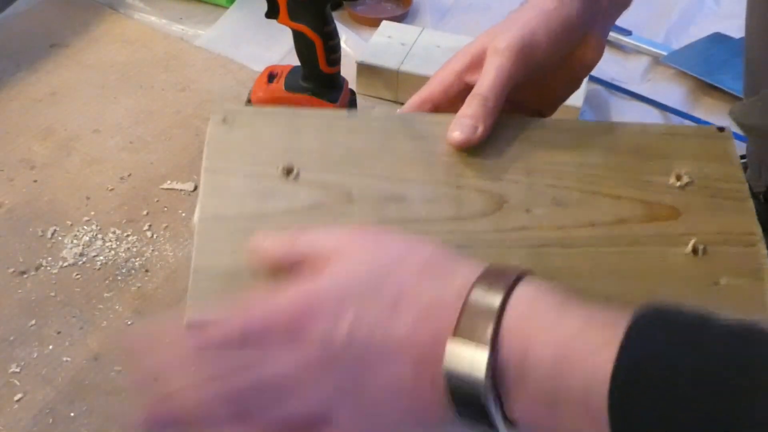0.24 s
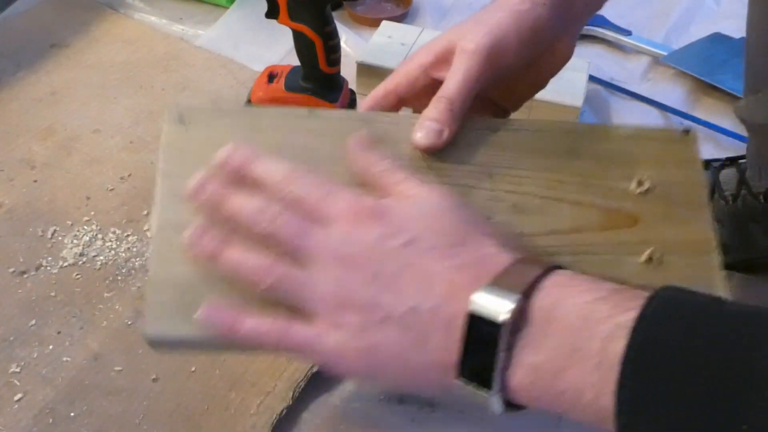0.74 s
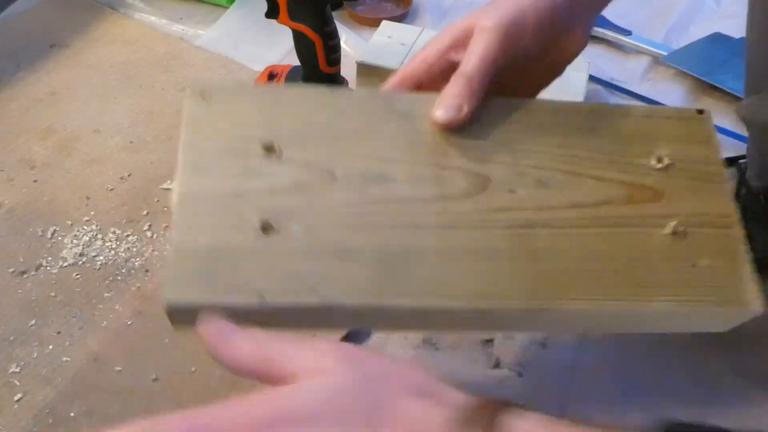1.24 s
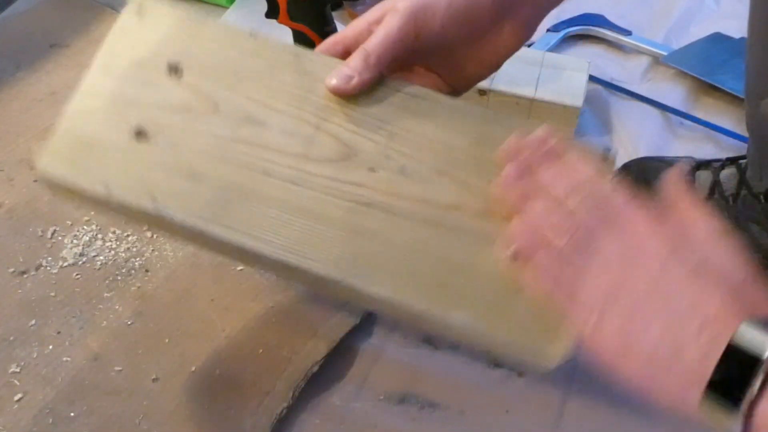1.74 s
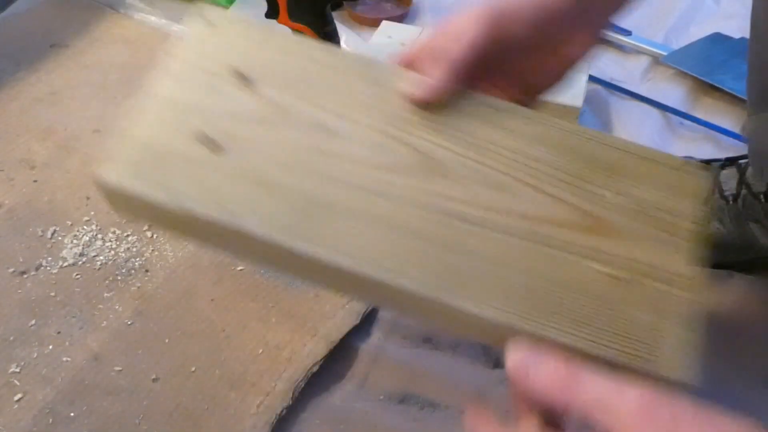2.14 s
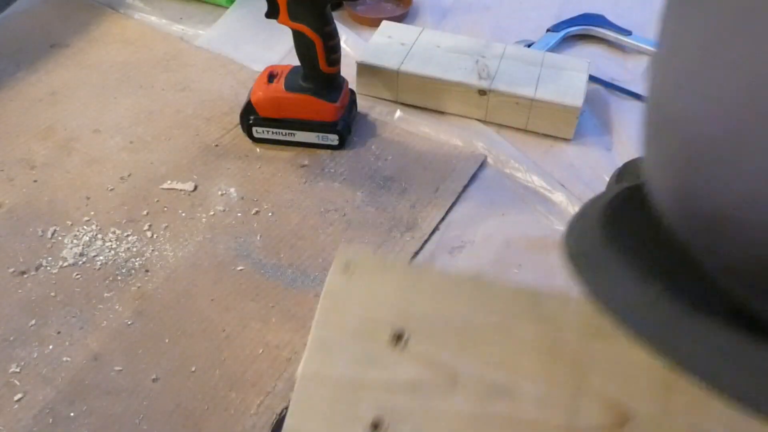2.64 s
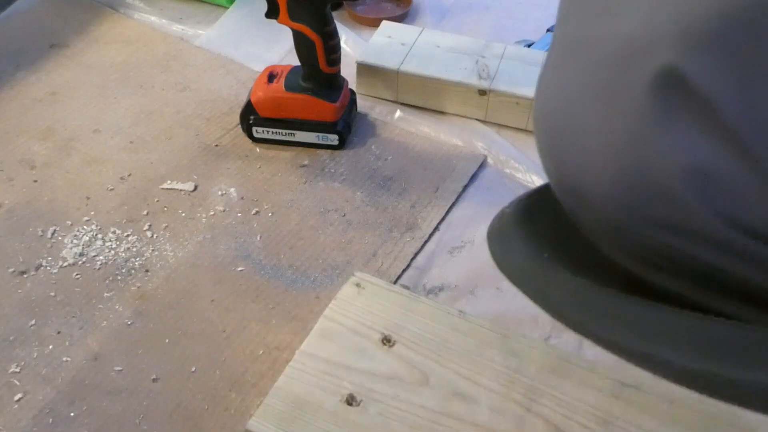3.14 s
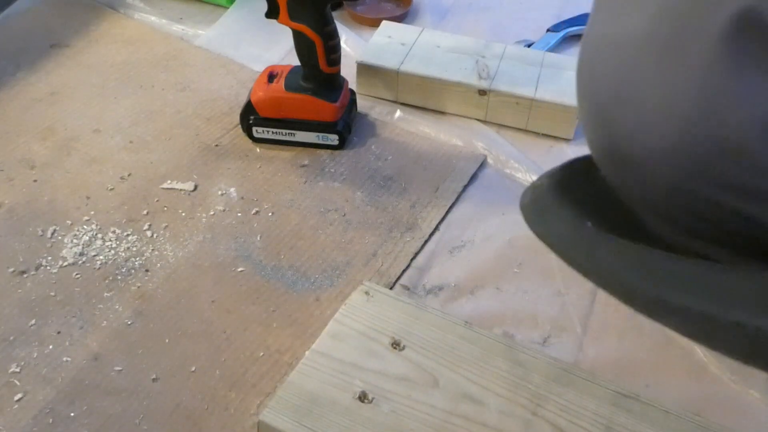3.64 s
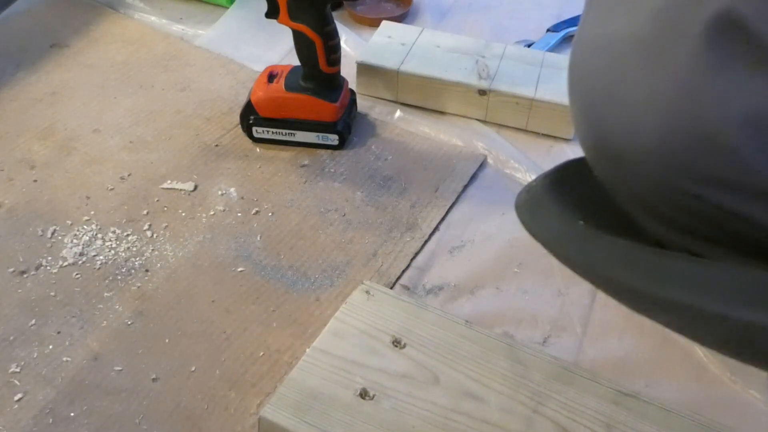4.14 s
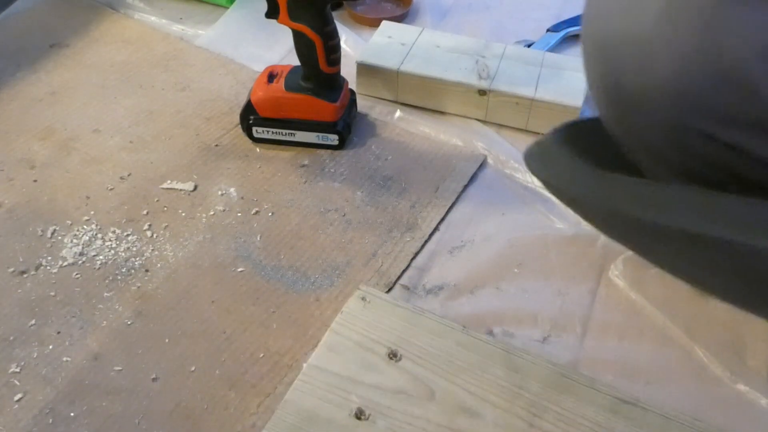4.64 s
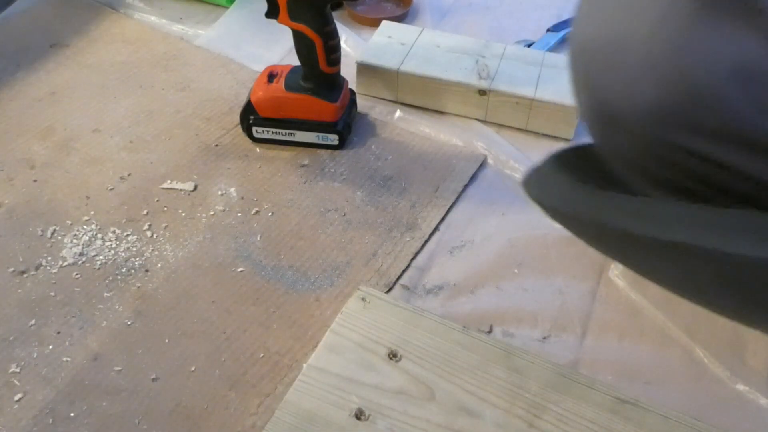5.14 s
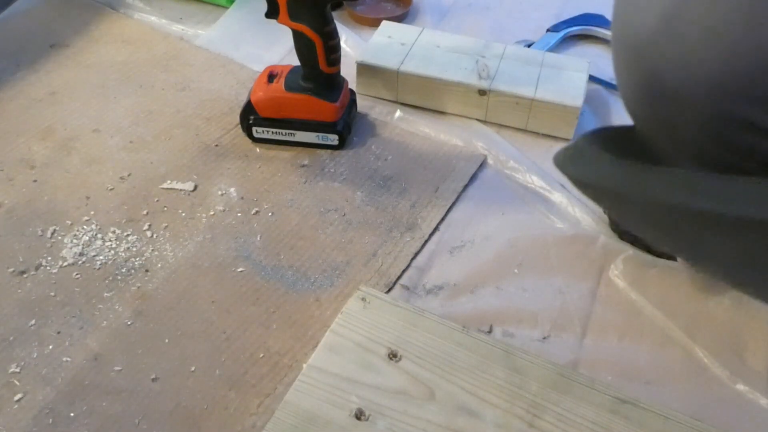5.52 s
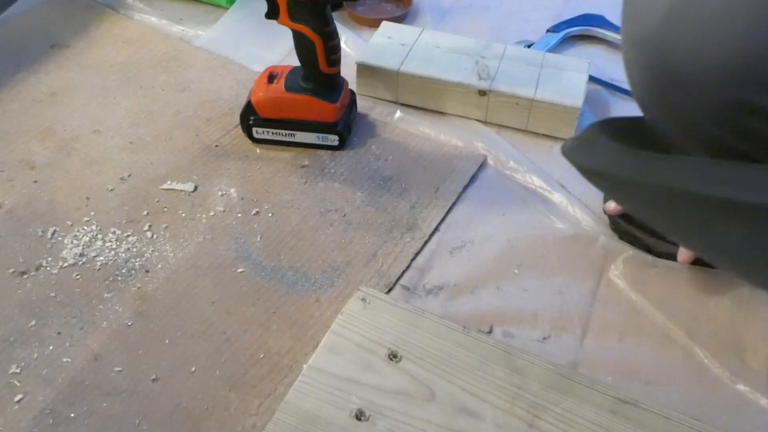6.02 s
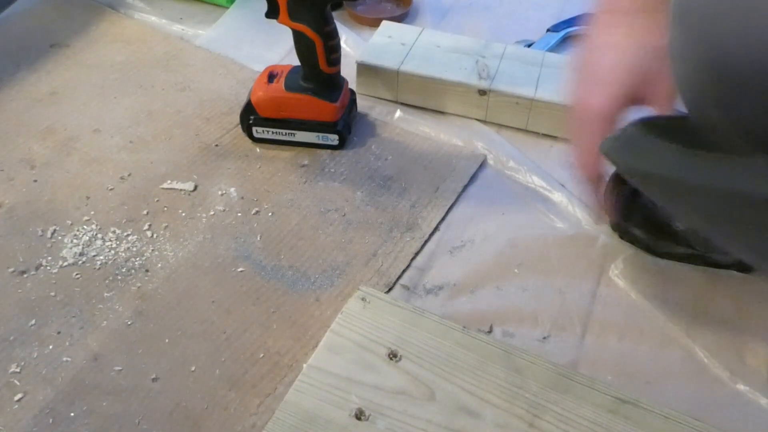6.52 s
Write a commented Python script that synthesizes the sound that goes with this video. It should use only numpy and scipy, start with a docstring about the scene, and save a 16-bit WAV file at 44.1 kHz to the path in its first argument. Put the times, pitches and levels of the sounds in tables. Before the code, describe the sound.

Dry rubbing strokes on sawn timber, breathy and slightly whistling, come fast and uneven for two seconds. A rough fabric swish with tiny grit clicks follows, then a short groaning drag and a loud wooden clatter that rings briefly. Several gritty hand-brushing scuffs follow, one strongest, with soft trouser rustles. The close stereo microphone picks up a short indoor echo, faint steady ticking and soft hiss.

```python
"""Dusting off a timber block

A hand brushes sawdust off a block in quick strokes, close by in a small workshop: filtered noise made of tiny slips.
Sleeves rustle as the block is swung aside; it drags, then lands on a floor board and rocks to rest in four knocks,
made of short blows and ringing tones. Then the kneeling worker brushes dust off both hands and shifts.
Faint ticking (noise bursts through resonances) and a steady background (shaped noise: room air in the middle,
the microphones' own low noise at the sides) run throughout."""
import sys
import numpy as np
from scipy import signal
from scipy.fft import rfft, irfft, next_fast_len
from scipy.io import wavfile
from scipy.ndimage import uniform_filter1d

SR = 44100
rng = np.random.default_rng(int(sys.argv[2]) if len(sys.argv) > 2 else 0)


def int16_out(signal):
    """Quantize to a 16-bit WAV file."""
    q = np.round(np.clip(np.atleast_2d(signal).T, -1, 1) * 32767)
    wavfile.write(sys.argv[1], SR, q.astype(np.int16))


N = 298998  # samples, about 6.8 s
T = np.arange(N) / SR


def amp(db):
    """Turns decibels into a gain."""
    return 10 ** (np.asarray(db) / 20)


def evened(x):
    """Scales a signal to an average (rms) strength of 1."""
    return x / np.sqrt(np.mean(x ** 2) + 1e-20)


def read(points, hz):
    """Reads a table between its points, on a log-frequency axis."""
    f, value = np.transpose(points)
    return np.interp(np.log(hz + 1), np.log(f + 1), value)


def add(mix, s, sound):
    """Mixes a sound in at a time in seconds."""
    part = mix[max(round(s * SR), 0):][:len(sound)]
    part += sound[:len(part)]


def coloured(x, spectrum):
    """Multiplies a signal's spectrum by a table of gains, then scales it to rms 1."""
    size = next_fast_len(N)
    gain = amp(read(spectrum, np.fft.rfftfreq(size, 1 / SR)))
    return evened(irfft(rfft(x, size) * gain, size)[:N])


def pulse(gain_at):
    """Makes the shortest pulse, with nothing before its start, for a given gain over frequency; peak 1."""
    hz = abs(np.fft.fftfreq(4096, 1 / SR))
    log_gain = np.log(np.maximum(gain_at(hz), 1e-5))
    # the Hilbert transform finds the phase that packs the energy at the start (minimum phase)
    shape = np.fft.ifft(np.exp(np.conj(signal.hilbert(log_gain)))).real[:2048]
    return shape / abs(shape).max()


def resonate(x, hz, width):
    """Lets one frequency through at gain 1, fading to either side: a two-pole resonance."""
    return signal.lfilter(*signal.iirpeak(hz, hz / width, SR), x)


def body(x, modes):
    """Passes a signal through steep resonances (frequency, width, dB), then scales the sum to rms 1."""
    total = np.zeros(N)
    for hz, width, db in modes:
        # two passes make steep sides; widening each pass makes up for the narrowing
        once = resonate(x, hz, 1.3 * width)
        total += amp(db) * resonate(once, hz, 1.3 * width)
    return evened(total)


def friction(per_s, spread_db, smooth, judder_db):
    """Countless tiny slips of uneven size over a smooth hiss; the contact judders in strength."""
    sizes = amp(spread_db * np.minimum(rng.exponential(1, N), 4))
    happens = rng.random(N) < per_s / SR
    slips = evened(rng.standard_normal(N) * sizes * happens)
    judder = coloured(rng.standard_normal(N), [(30, 0), (150, -10), (600, -50)])
    return evened(slips + smooth * rng.standard_normal(N)) * amp(judder_db * judder)


def gesture(s, hold_s, rise_s, fade_s):
    """Contact builds up to a time, holds, and dies away exponentially."""
    before = np.minimum(T - s, 0) / max(rise_s, .0005)
    after = np.maximum(T - s - hold_s, 0) / max(fade_s, .002)
    return np.exp(before - after)


def level(curve):
    """Gain over time from a dB curve; silent outside it."""
    s, db = np.transpose(curve)
    return amp(np.interp(T, s, db, -np.inf, -np.inf))


# room air in the middle, tone balance: (frequency [Hz], relative level [dB per Hz])
AIR_TONE = [(15, -50.5), (25, -20), (59, -13.5), (212, 5.5), (641, -2), (818, -1), (1650, -12.5),
            (1840, -4), (3340, -12), (3620, -10), (4370, -11), (11900, -14), (16000, -24)]
# the microphones' own low noise at the sides, tone balance: (frequency [Hz], relative level [dB per Hz])
MICROPHONE_NOISE_TONE = [(25, -9), (60, -7), (170, 12), (450, 12.5), (900, 5), (1600, 0), (2600, -2.5),
                         (3600, -10.5), (5500, -42), (8000, -43.5), (11000, -33), (16000, -36.5)]


def background(air_db=-62.0, side_db=-55.0):
    """Steady background: room air in the middle, the microphones' own low noise at the sides."""
    middle = amp(air_db) * coloured(rng.standard_normal(N), AIR_TONE)
    side = amp(side_db) * coloured(rng.standard_normal(N), MICROPHONE_NOISE_TONE)
    return np.array([middle + side, middle - side])


# narrow resonances of the ticking: (frequency [Hz], width [Hz], relative level [dB])
TICK_RESONANCES = [(1889, 55, 7), (2330, 150, 0.5), (2830, 104, 0.5), (3730, 150, 3.5), (3950, 380, -3),
                   (4770, 37, 0.5)]
# the ticking grows: (around time [s], over time [s], by level [dB])
TICK_SWELL = (5.33, 0.11, 1.26)


def ticking(typical_per_s=95, unevenness=0.75, flutter_db=2, db=-66.0, side_db=-71):
    """Tiny uneven ticks ring a few narrow resonances; one more reaches the two sides in opposite phase."""
    ticks = np.zeros(N)
    gaps, sizes = rng.standard_normal((2, 900))
    times = np.cumsum(np.exp(unevenness * gaps)) / typical_per_s
    fade = np.exp(-np.arange(600) / SR / .008)
    for s, size in zip(times, amp(flutter_db * sizes.clip(-2, 1))):
        add(ticks, s, size * rng.standard_normal(600) * fade)
    side = amp(side_db) * body(ticks, [(3660, 140, 0)])
    around_s, over_s, by_db = TICK_SWELL
    swell = amp(by_db * .5 * np.tanh((T - around_s) / over_s))
    return swell * (amp(db) * body(ticks, TICK_RESONANCES) + np.array([side, -side]))


# the hand strokes the timber: (full contact time [s], hold [s], rise time [s], relative rub level [dB],
# relative fine hiss level [dB], frequency at which the timber sings [Hz], singing level over the rub's [dB])
HAND_STROKES = [(0.0, 0.0062, .01, -59, -56, 1960, 3), (0.093, 0.059, 0.032, -47.5, -49, 1940, -1),
                (0.243, 0.0087, 0.0095, -50.5, -56.5, 1940, -6),
                (0.322, 0.013, 0.0082, -63, -63, 1940, -13), (0.482, .05, 0.017, -53, -52, 1890, -11),
                (0.548, 0.067, 0.01, -50.5, -52, 1900, -30), (0.713, 0.12, 0.02, -47.5, -50, 1890, -11.5),
                (0.948, 0.059, .016, -41.5, -42.5, 1900, -12), (1.112, 0.057, 0.026, -47, -44, 1840, -16),
                (1.191, 0.049, 0.031, -42.5, -44.5, 1835, -4.5),
                (1.581, 0.037, 0.0012, -46, -44.5, 1820, -6), (1.637, 0.035, 0.0078, -50.5, -40, 2080, 0.5),
                (1.848, 0.058, 0.035, -41.5, -37, 2310, -11)]
# fingers rub faintly as they hold on or shift: (time [s], hold [s], relative level [dB])
FINGER_GRIPS = [(1.357, 0.23, -62), (2.028, 0.15, -62.5), (5.685, 0.0078, -65.5), (5.752, 0.025, -57),
                (6.205, 0.0087, -66.5)]
# tone balance of skin on wood: (frequency [Hz], relative level [dB per Hz])
SKIN_TONE = [(350, -25), (600, -20), (801, -9.5), (1080, -12.5), (1550, -11.5), (1660, -10), (1800, 0),
             (2830, -3), (3160, 1), (4110, -4.5), (4460, 0), (7940, -6.5), (9360, -1.5), (14900, -16.5),
             (16000, -16)]
# tone balance of the low murmur under a push, also of flapping folds: (frequency [Hz], relative level [dB per Hz])
PUSH_TONE = [(60, -22.5), (140, -14), (280, 4), (480, -0.5), (700, -12), (1500, -37.5), (4000, -80.5)]


def hand(ridge_db=2.5, sharpness=9, grip_s=0.044, lift_s=0.034):
    """Skin catches on the ridges of sawn grain; the block murmurs under the push and sings in a narrow band."""
    rub = coloured(friction(per_s=8000, spread_db=1.8, smooth=1.5, judder_db=1.2), SKIN_TONE)
    # the shifting gap under the fingers picks out narrow bands that come and go
    z = signal.stft(rub, nperseg=512)[2]
    bands = uniform_filter1d(rng.standard_normal(z.shape), size=14, axis=1)
    bands = evened(uniform_filter1d(bands, size=2, axis=0))
    rub = signal.istft(z * amp(ridge_db * bands), nperseg=512)[1][:N]
    # split the rub at 6 kHz into a coarse part and a fine hiss
    coarse = signal.sosfiltfilt(signal.butter(3, 6000, fs=SR, output="sos"), rub)
    fine = amp(1.33) * evened(rub - coarse)
    murmur = coloured(rng.standard_normal(N), PUSH_TONE)
    low = amp(-1.5) * evened(coarse) + amp(-19) * murmur
    slips = friction(per_s=1200, spread_db=1.5, smooth=0.61, judder_db=0.0)
    out = np.zeros(N)
    for s, hold_s, db in FINGER_GRIPS:
        out += amp(db) * low * gesture(s, hold_s, grip_s, grip_s)
    for s, hold_s, rise_s, rub_db, hiss_db, hz, sing_db in HAND_STROKES:
        sing = amp(sing_db) * body(slips, [(hz, hz / sharpness, 0)])
        stroke = amp(rub_db) * (low + sing) + amp(hiss_db) * fine
        out += stroke * gesture(s, hold_s, rise_s, lift_s)
    return out


# the palm meets the block: (time [s], relative peak level [dB])
PALM_PATS = [(0.035, -48), (0.462, -42.5), (0.548, -48), (0.801, -46), (0.963, -42.5), (1.17, -40),
             (1.581, -30), (1.877, -37.5)]
# the held block's answer to a pat: (frequency [Hz], relative level [dB])
BLOCK_NUDGE = [(60, -30), (160, -6), (290, 1.5), (480, 1), (700, -15.5), (1500, -44), (4000, -76)]


def pats(trim_db=-2.5):
    """Soft pushes of the palm nudge the held block into a brief, dull ring: one shaped pulse each."""
    out, pat = np.zeros(N), pulse(lambda hz: amp(read(BLOCK_NUDGE, hz)))
    for s, db in PALM_PATS:
        add(out, s, amp(db + trim_db) * pat)
    return out


# crumbs of grit and creases snap: (time [s], relative level [dB], centre frequency [Hz])
GRIT_SNAPS = [(0.0892, -25.5, 2530), (0.4623, -33, 1890), (0.551, -24, 5860), (0.9564, -38, 9910),
              (0.9792, -41, 9190), (1.1667, -20, 3100), (1.421, -38.5, 9400), (2.229, -38.5, 2150),
              (2.2535, -38, 3500), (2.6833, -31, 1030), (2.8379, -30.5, 1150), (2.9043, -31, 3130),
              (3.03, -24, 2020), (3.1225, -29.5, 2620), (3.4018, -28, 6800), (3.863, -30.5, 4640),
              (4.062, -27.5, 8500), (4.0877, -27, 10050), (4.118, -24, 4500), (4.4476, -39, 2910),
              (4.9345, -34.5, 2940), (6.199, -45, 3610)]


def snaps(octaves=0.81, crumble_s=0.0036, crumble=0.39, trim_db=-20.5):
    """Each snap is a small click around one frequency, with a crumbling tail of fading noise."""
    out, t = np.zeros(N), np.arange(900) / SR
    for s, db, centre_hz in GRIT_SNAPS:
        def click_gain(hz):
            """A hump around the centre frequency, cut above about 13 kHz."""
            distance = np.log2((hz + 1) / centre_hz) / octaves
            return 1 / (1 + distance ** 4) / (1 + (hz / 13000) ** 12)

        crumbling = crumble * rng.standard_normal(len(t)) * np.exp(-t / crumble_s)
        snap = signal.fftconvolve(pulse(click_gain), (t == 0) + crumbling)[:len(t)]
        add(out, s, amp(db + trim_db) * evened(snap))
    return out


# pockets of air sing as palms close; the 227 Hz row is a low thump:
# (middle time [s], length [s], frequency [Hz], level [dB])
POCKETS_AND_THUMP = [(0.545, 0.042, 1410, -47), (0.799, .035, 1554, -42.5), (0.958, 0.032, 1490, -44),
                     (4.276, .07, 1400, -50.5), (4.724, .046, 227, -47), (4.793, 0.21, 1160, -56)]


def hollows(sharpness=8):
    """Friction swells and fades through a resonance: closing air pockets sing, and one low thump sounds."""
    slips = friction(per_s=1400, spread_db=2.5, smooth=0.88, judder_db=-2.0)
    out = np.zeros(N)
    for s, length_s, hz, db in POCKETS_AND_THUMP:
        swell = np.exp(-(2 * (T - s) / length_s) ** 2)
        out += amp(db) * swell * body(slips, [(hz, 40 + hz / sharpness, 0)])
    return out


# one long sweep of the arms carries the block aside: (time [s], relative swish level [dB])
ARM_SWEEP = [(2.21, -70), (2.27, -50.5), (2.38, -45), (2.46, -49.5), (2.52, -45.5), (2.66, -51.5),
             (2.79, -45), (3.2, -51.5), (3.27, -51.5), (3.37, -61.5)]
# loose folds flap in the sweep: (fullest time [s], hold [s], rise time [s], fade time [s], relative level [dB])
FOLD_FLAPS = [(2.286, 0.14, 0.09, .1, -61.5), (2.78, .1, 0.19, .17, -53.5)]
# shorter shifts of sleeves and trousers: (time [s], hold [s], rise time [s], fade time [s],
# swish level [dB], relative level of the flapping folds [dB])
CLOTH_SHIFTS = [(3.44, 0.084, .02, 0.095, -50, -63), (3.76, 0.12, 0.056, 0.059, -59, -76),
                (4.42, 0.31, 0.15, 0.064, -53.5, -60.5), (4.975, 0.13, .05, 0.29, -58.5, -64.5),
                (6.43, 0.035, 0.039, 0.09, -55, -70), (6.495, .06, 0.023, .07, -66, -55.5)]
# tone balance of fabric on fabric: (frequency [Hz], relative level [dB per Hz])
FABRIC_TONE = [(240, -32), (400, -6), (598, -9), (865, 0), (949, -4), (1140, -2), (2120, -0.5),
               (4880, -3.5), (7990, -8.5), (9920, -5), (14800, -18.5), (16000, -28.5)]


def cloth(sleeve_s=2.36, blend_s=0.085, sweep_db=-.5, flap_db=-4):
    """The block turns in the fingers, then fabric slides over fabric while its folds flap."""
    slips = friction(per_s=3000, spread_db=2.6, smooth=1.3, judder_db=.9)
    # the tone passes from skin to fabric around sleeve_s
    sleeve = .5 + .5 * np.tanh((T - sleeve_s) / blend_s / 2)
    swish = (1 - sleeve) * coloured(slips, SKIN_TONE) + sleeve * coloured(slips, FABRIC_TONE)
    folds = amp(flap_db) * coloured(rng.standard_normal(N), PUSH_TONE)
    out = amp(sweep_db) * swish * level(ARM_SWEEP)
    for s, hold_s, rise_s, fade_s, db in FOLD_FLAPS:
        out += amp(db) * folds * gesture(s, hold_s, rise_s, fade_s)
    for s, hold_s, rise_s, fade_s, swish_db, folds_db in CLOTH_SHIFTS:
        moving = amp(swish_db) * swish + amp(folds_db) * folds
        out += moving * gesture(s, hold_s, rise_s, fade_s)
    return out


# dusty scuffs, and palms that meet and slide apart: (full contact time [s], hold [s], rise time [s],
# fade time of the hiss [s], relative grit hiss level [dB], relative drag level [dB])
DUSTY_SCUFFS = [(3.401, 0.062, 0.016, .008, -49, -46.5), (3.872, 0.028, .008, .02, -44, -47.5),
                (3.901, 0.0045, 0.0029, 0.046, -39.5, -36.5), (4.084, 0.018, 0.042, 0.07, -41, -48.5),
                (4.273, 0.02, 0.025, 0.043, -39, -40.5), (4.533, 0.0082, 0.0028, 0.036, -50, -53),
                (4.695, 0.0056, 0.0043, 0.078, -33, -29), (4.935, 0.0027, 0.0038, 0.02, -58.5, -48.5),
                (5.752, 0.03, 0.0091, 0.018, -65, -62)]
# tone balance of rolling dust: (frequency [Hz], relative level [dB per Hz])
GRIT_TONE = [(1180, -27.5), (2000, -12), (2760, -7), (3260, -4.5), (3940, -1), (4450, 1), (8050, -5.5),
             (10000, -0.5), (14500, -16), (16000, -26)]
# tone balance of dragging palms: (frequency [Hz], relative level [dB per Hz])
DRAG_TONE = [(30, -48), (70, -39.5), (130, -18), (230, -10.5), (330, -8), (520, -7), (680, -10),
             (900, -6.5), (1300, -3), (1550, -6), (2000, -3.5), (2800, -10), (3400, -3.5), (5000, -40.5)]
# resonances of cupped palms: (frequency [Hz], width [Hz], relative level [dB])
CUPPED_PALMS = [(870, 390, 1), (1160, 170, -6.5), (1260, 150, 9.5)]


def scuffs(drag_fade_share=0.69):
    """Dust rolls between sliding surfaces: it hisses, and drags the cupped palms into sound."""
    rolling = friction(per_s=3700, spread_db=1.5, smooth=1.1, judder_db=1.2)
    grit = amp(-.7) * coloured(rolling, GRIT_TONE)
    slips = friction(per_s=1900, spread_db=-1, smooth=1.0, judder_db=2)
    drag = amp(-1.5) * coloured(slips, DRAG_TONE) + amp(-14.0) * body(slips, CUPPED_PALMS)
    out = np.zeros(N)
    for s, hold_s, rise_s, fade_s, hiss_db, drag_db in DUSTY_SCUFFS:
        out += amp(hiss_db) * grit * gesture(s, hold_s, rise_s, fade_s)
        # the pressure lets go sooner than the sliding stops
        out += amp(drag_db) * drag * gesture(s, hold_s, rise_s, drag_fade_share * fade_s)
    return out


# the block's edge drags on the board just before it drops: (time [s], frequency [Hz], width [Hz], level [dB])
EDGE_SKID = [(3.443, 780, 129, -42.5)]


def skid(rise_s=.028, fade_s=.02):
    """The dragging edge groans louder until the block lands: friction through one resonance."""
    slips = friction(per_s=1200, spread_db=3, smooth=0.54, judder_db=-2.0)
    out = np.zeros(N)
    for s, hz, width, db in EDGE_SKID:
        out += amp(db) * body(slips, [(hz, width, 0)]) * gesture(s, .012, rise_s, fade_s)
    return out


# the block lands and rocks: (time [s], relative blow level [dB], frequency above which the blow weakens [Hz])
BLOCK_KNOCKS = [(3.4550, 2.5, 997), (3.481, -21, 650), (3.5049, -0.5, 996), (3.5310, -8.5, 715)]
# tone balance of a blow on the board: (frequency [Hz], relative level [dB])
BLOW_TONE = [(30, -52), (80, -37), (130, -17.5), (220, 0), (400, 4), (620, 0), (900, -5), (1400, -7),
             (2100, -11), (5000, -8), (9000, -21)]
# block and board ring together: (frequency [Hz], relative level [dB],
# time to fade by 60 dB [s], capped by longest_ring_s below)
BOARD_RING = [(117, -25, 0.72), (146, -21.5, .45), (186, -12, 0.42), (243, -13, 0.301), (269, -5.5, 0.27),
              (341, -11.5, .42), (388, -2.5, 0.37), (425, -11, 0.21), (478, 1, 1), (564, -8, .48),
              (604, -5, .38), (702, -13.5, .45), (784, -19, .45), (830, -17.5, .42), (1003, -15, .45),
              (1093, -12.5, 0.45), (1165, -9, 0.68), (1250, -12.5, .45), (1302, -15, 0.44)]
# the timber's own high resonances: (frequency [Hz], width [Hz], relative level [dB])
TIMBER_CHATTER = [(1680, 68, -10.5), (1817, 85, -1), (2066, 160, -2.5)]
# the crack of dust under an edge: (frequency [Hz], width [Hz], relative level [dB])
DUST_CRACK = [(2170, 550, 1), (3820, 1300, -4.5)]


def knocks(ring_db=-31, blow_db=-2.36, lag_s=0.00099, chatter_db=-38, chatter_s=0.056, crack_db=-66,
           longest_ring_s=.52):
    """Each edge of the block gives the board a short blow; the timber chatters and rings on after it."""
    blows, strikes, t = np.zeros(N), np.zeros(N), np.arange(SR) / SR
    # bending waves spread out in the board: low tones arrive later (by lag_s at 500 Hz)
    travel = np.exp(-4j * np.pi * lag_s * np.sqrt(500 * np.fft.rfftfreq(4096, 1 / SR)))
    for s, db, contact_hz in BLOCK_KNOCKS:
        blow = pulse(lambda hz: amp(read(BLOW_TONE, hz)) / np.sqrt(1 + (hz / contact_hz) ** 8))
        add(blows, s, -amp(db) * irfft(rfft(blow, 2 * len(blow)) * travel))
        add(strikes, s, amp([db]))
    ring = np.zeros(SR)
    for hz, db, t60 in BOARD_RING:
        fade_db = -60 * t / min(t60, longest_ring_s)
        ring += amp(db + fade_db) * np.sin(2 * np.pi * hz * t)
    ring *= 1 - np.exp(-t / 0.0044)  # the ring builds as the waves cross the board
    ringing = signal.fftconvolve(strikes, ring)[:N]
    # dust is crushed under each edge
    grit = rng.standard_normal(SR) * np.exp(-t / 0.0012)
    crack = body(signal.fftconvolve(strikes, grit)[:N], DUST_CRACK)
    # the face chatters from 12 ms after the first knock
    since = np.maximum(T - BLOCK_KNOCKS[0][0] - .012, 0)
    chatter_swell = (1 - np.exp(-since / 0.0028)) * np.exp(-since / chatter_s)
    chatter = body(rng.standard_normal(N), TIMBER_CHATTER) * chatter_swell
    contact = amp(blow_db) * (blows + amp(crack_db) * crack)
    return contact + amp(ring_db) * ringing + amp(chatter_db) * chatter


# stereo width of the reflections at two closely spaced microphone ports: (frequency [Hz], side minus mid [dB])
REFLECTION_WIDTH = [(50, -7.5), (130, -7.5), (400, -13), (1200, -5.5), (2200, -4.5), (4000, -47.5),
                    (8000, -38), (13000, -8)]


def ports(mid, diffuse):
    """Left and right: sound from all around differs a little between the ports."""
    size = 2 ** 19
    gain = amp(read(REFLECTION_WIDTH, np.fft.rfftfreq(size, 1 / SR)))
    side = irfft(rfft(diffuse, size) * gain)[:N]
    return np.array([mid + side, mid - side])


# how fast the workshop's echoes die: (frequency [Hz], time to fade by 60 dB [s])
ROOM_FADE = [(100, 0.51), (300, 0.39), (700, .48), (2000, 0.35), (6000, .35), (14000, 0.29)]


def room(x, build_s=0.0028):
    """Dense reflections, made from noise in which each band dies at its own speed."""
    hz, t, z = signal.stft(rng.standard_normal((2, SR)), SR, nperseg=256)
    fade = amp(-60 * t / read(ROOM_FADE, hz)[:, None])
    tail = signal.istft(z * fade, SR, nperseg=256)[1]
    tail = tail * (1 - np.exp(-(np.arange(tail.shape[1]) / SR / build_s) ** 2))
    tail = tail / np.linalg.norm(tail[0])
    mid, diffuse = signal.fftconvolve(x[None], tail, axes=1)[:, :N]
    return ports(mid, diffuse)


def off_centre(x, lead=0.027):
    """Direct sound reaches the left port a fraction of a sample early and the right as much late."""
    slope = lead * np.diff(x, prepend=0)
    return np.array([x + slope, x - slope])


def scene():
    """Handling close by, dusting and the landing a little farther, all in one room."""
    near = hand() + pats() + snaps() + hollows() + cloth() + skid()
    dusting, landing = scuffs(), knocks()
    direct = off_centre(near + amp(-1.5) * dusting + landing)
    reflected = room(amp(-9.0) * near + amp(-6.5) * dusting + amp(-6.0) * landing)
    return background() + ticking() + direct + reflected


def record(dry, edge_hz=15800):
    """The upper band limit: a steep filter removes the highest treble."""
    band_limit = signal.firwin(511, edge_hz, window=("kaiser", 9), fs=SR)
    return signal.oaconvolve(dry, band_limit[None], "same")


dry = scene()
out = record(dry)
int16_out(out)
```